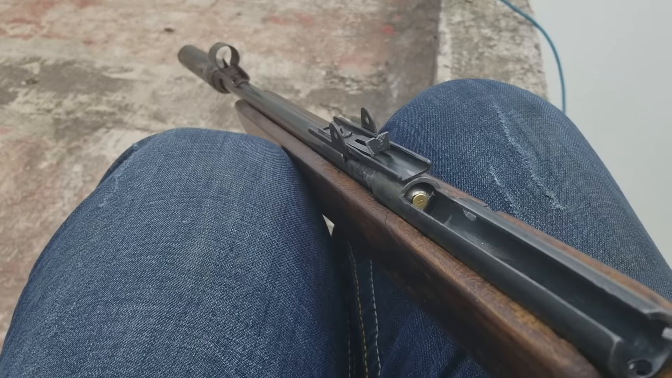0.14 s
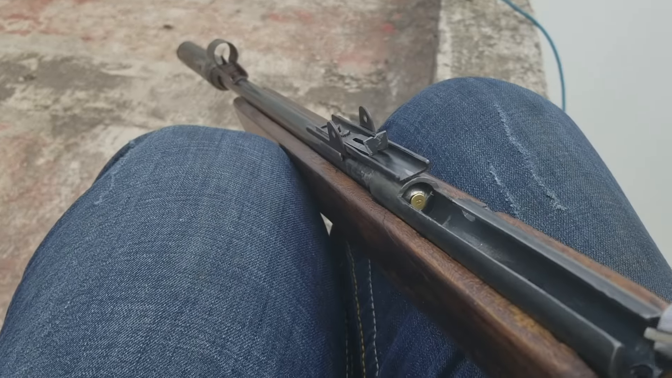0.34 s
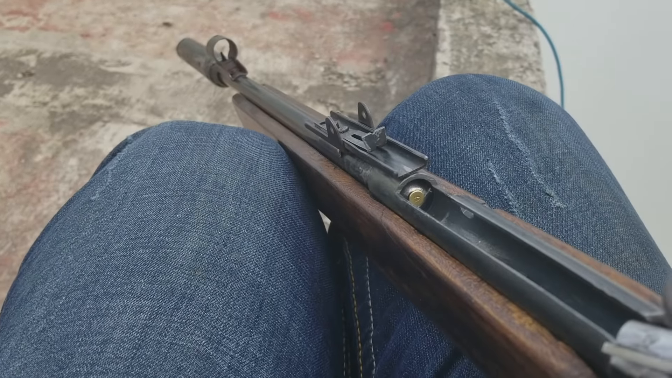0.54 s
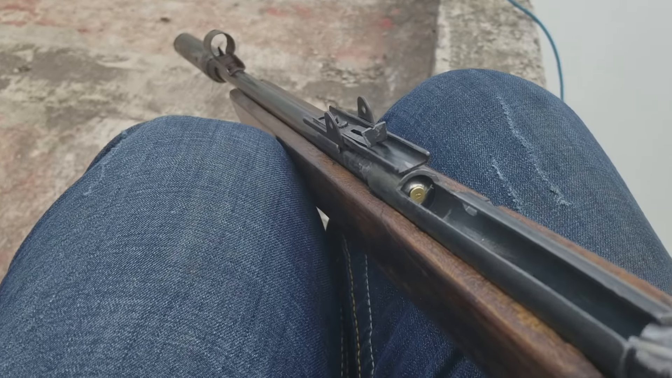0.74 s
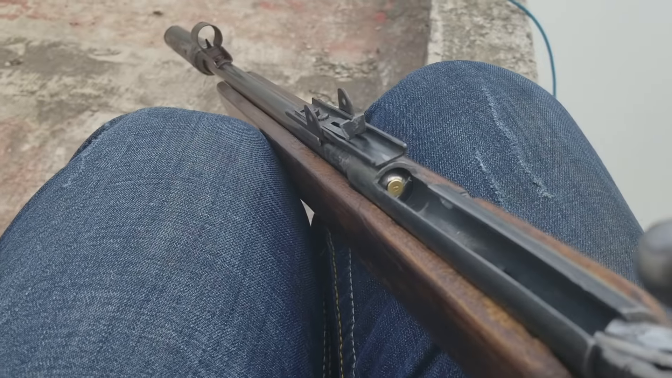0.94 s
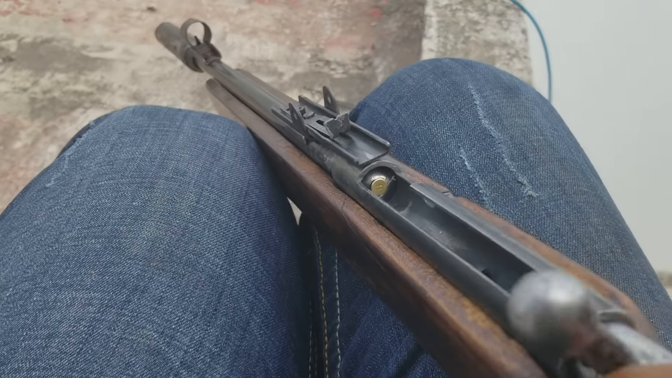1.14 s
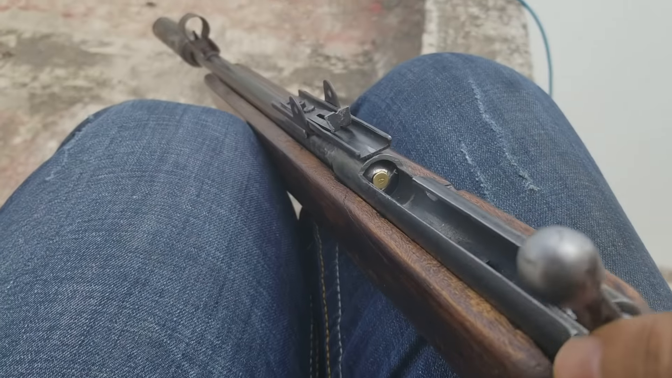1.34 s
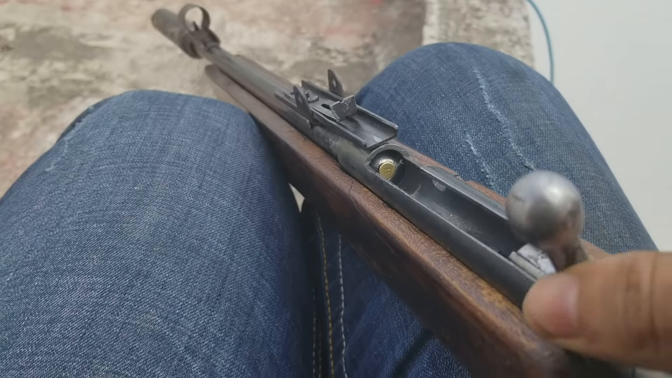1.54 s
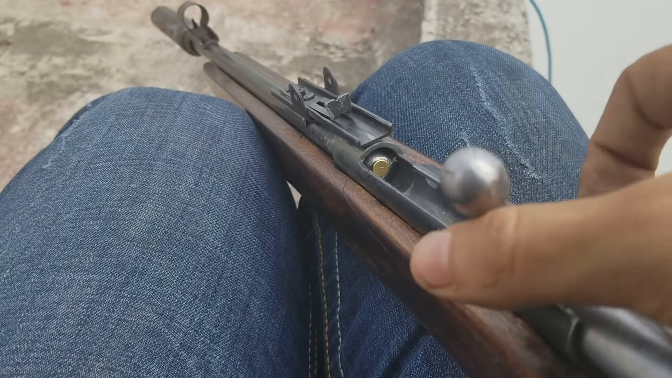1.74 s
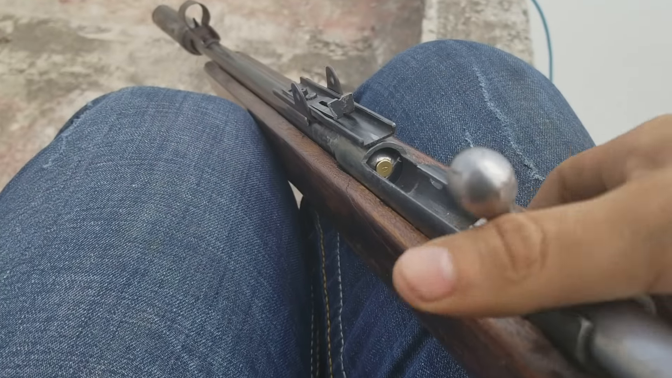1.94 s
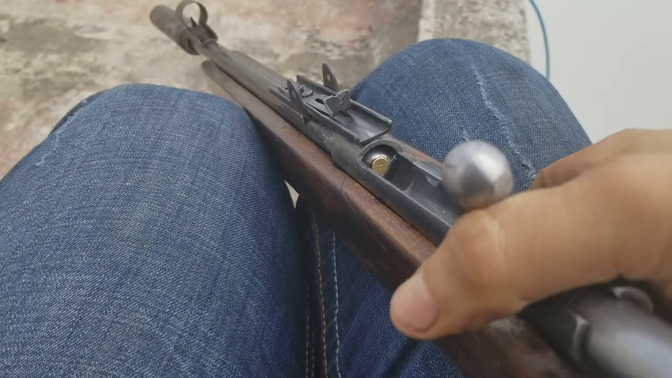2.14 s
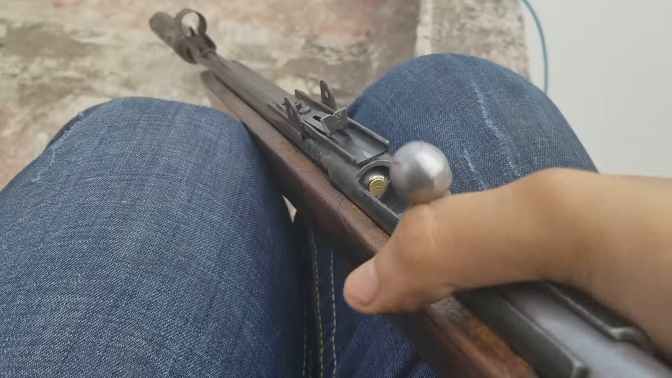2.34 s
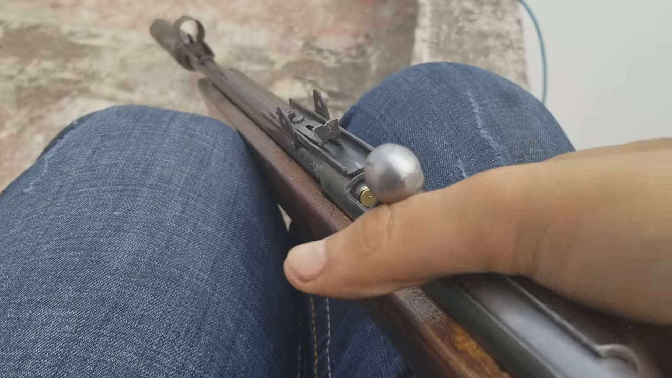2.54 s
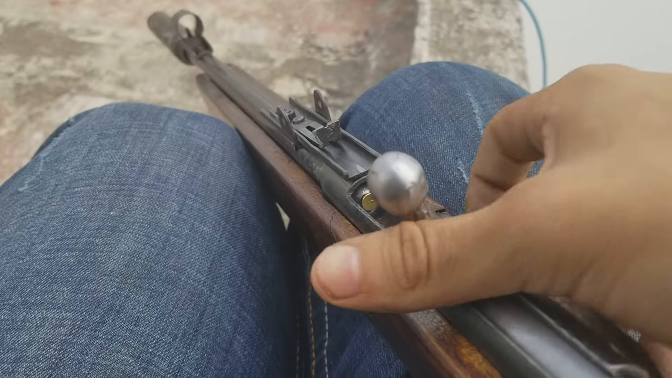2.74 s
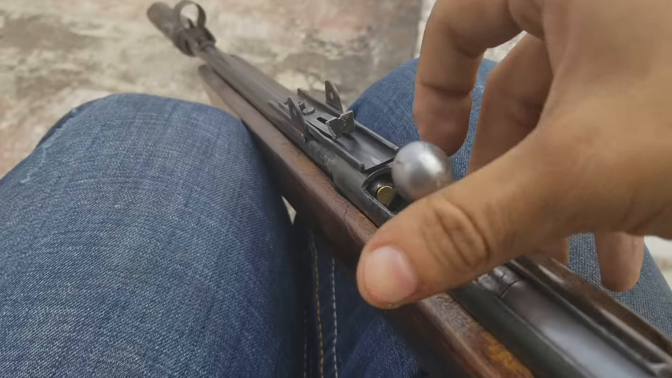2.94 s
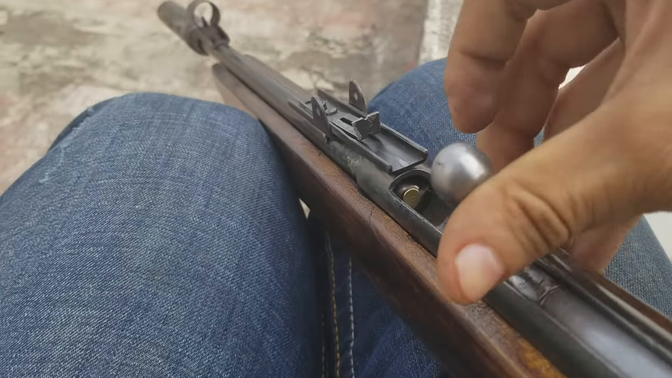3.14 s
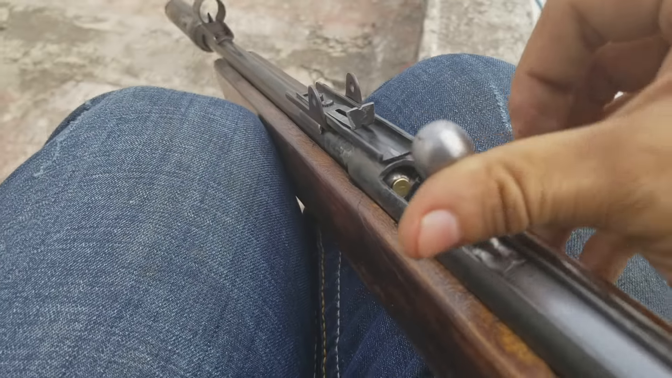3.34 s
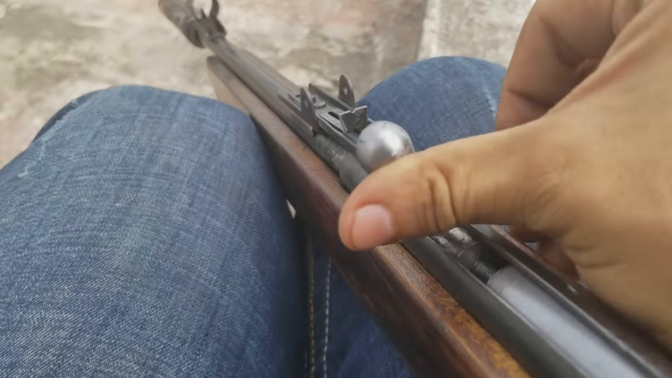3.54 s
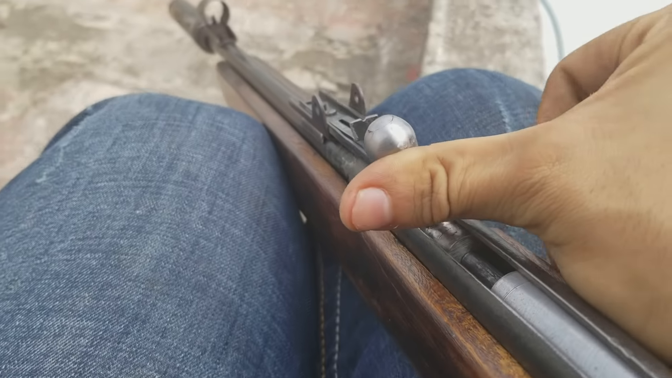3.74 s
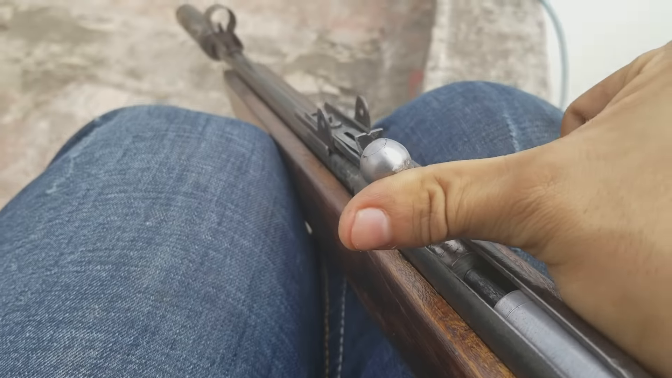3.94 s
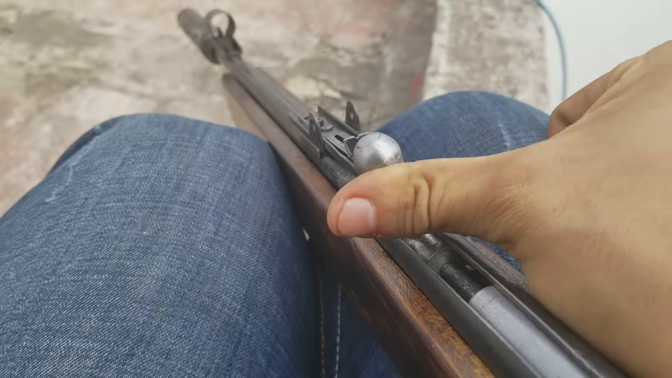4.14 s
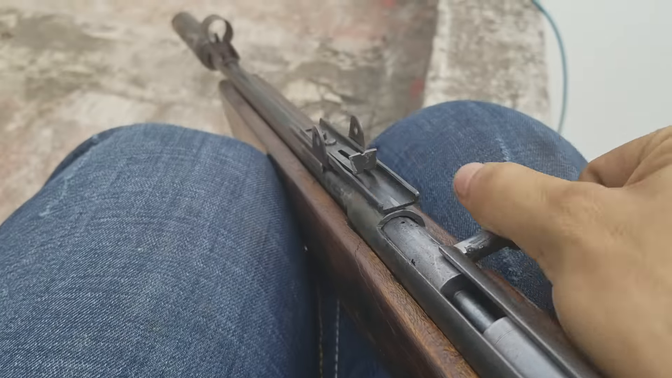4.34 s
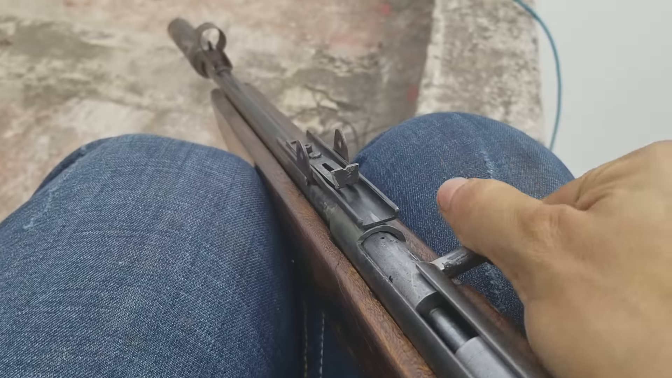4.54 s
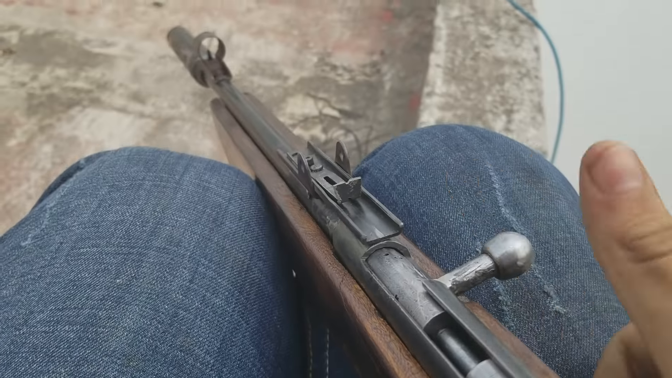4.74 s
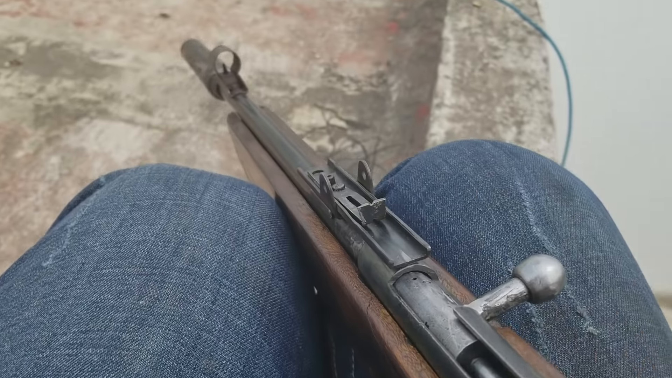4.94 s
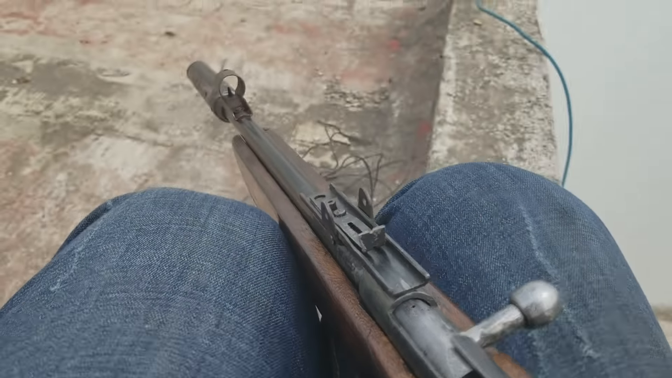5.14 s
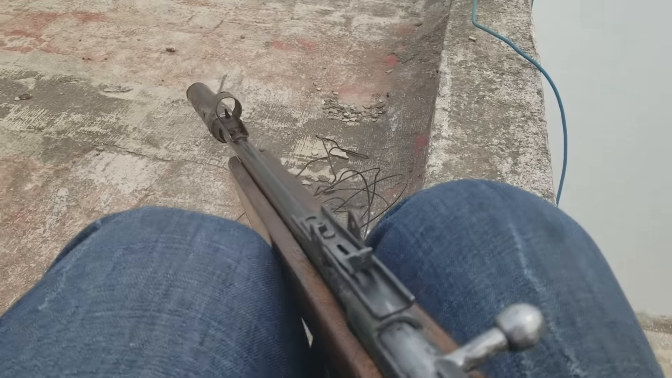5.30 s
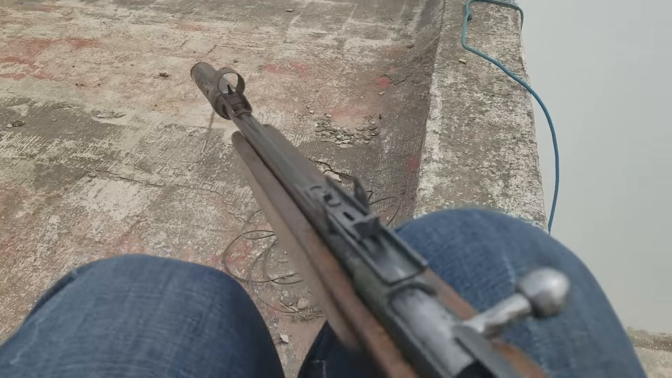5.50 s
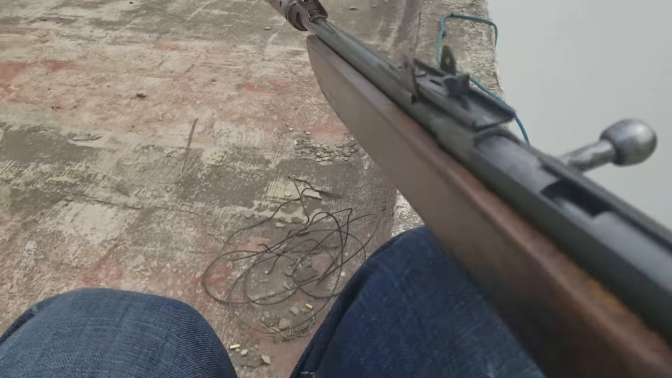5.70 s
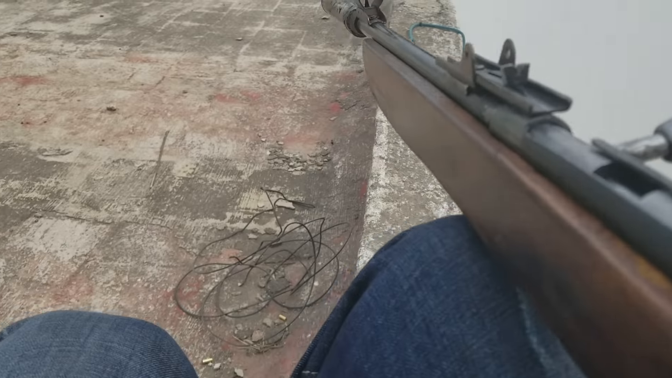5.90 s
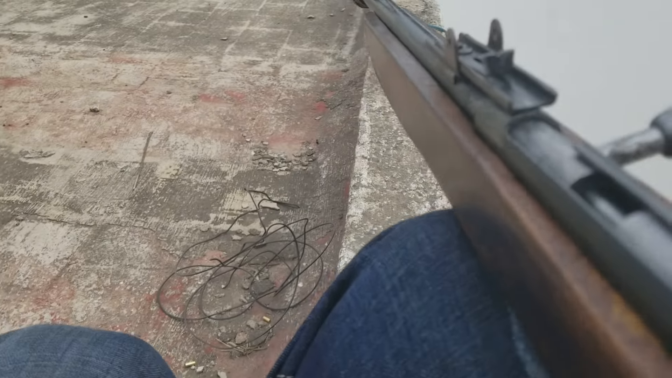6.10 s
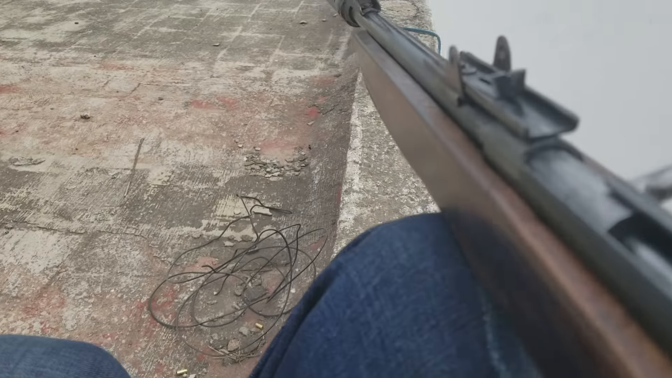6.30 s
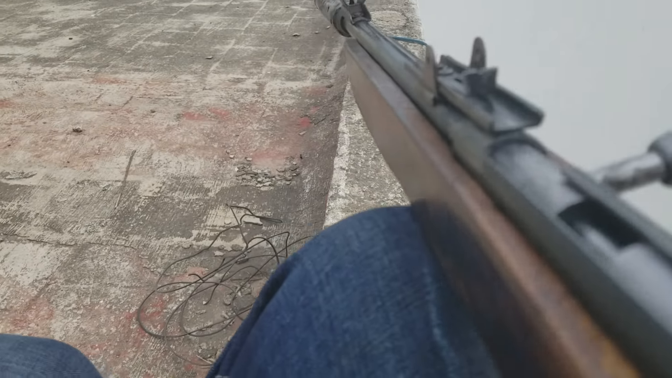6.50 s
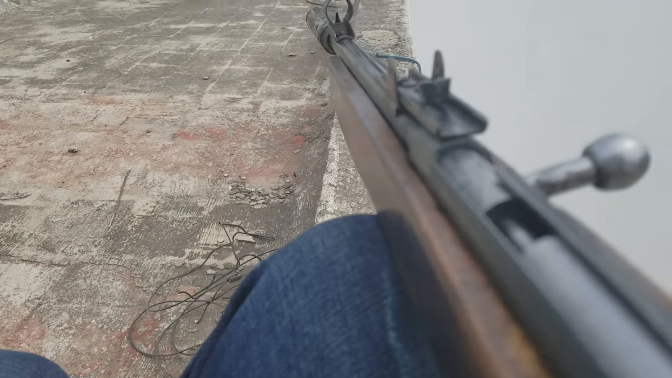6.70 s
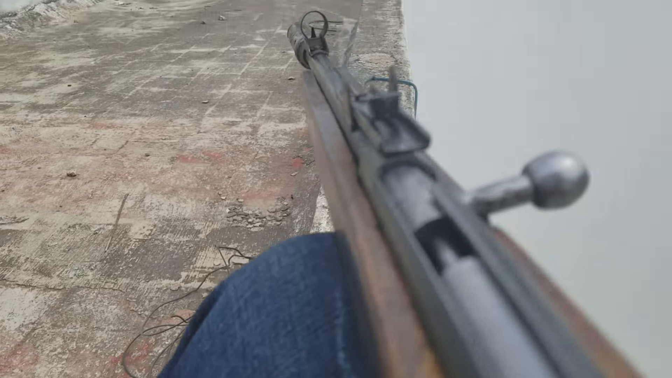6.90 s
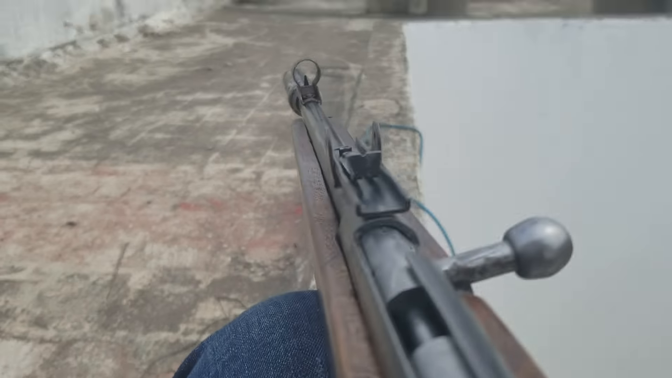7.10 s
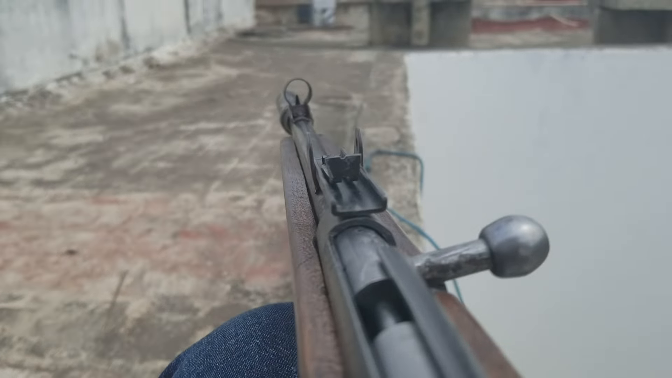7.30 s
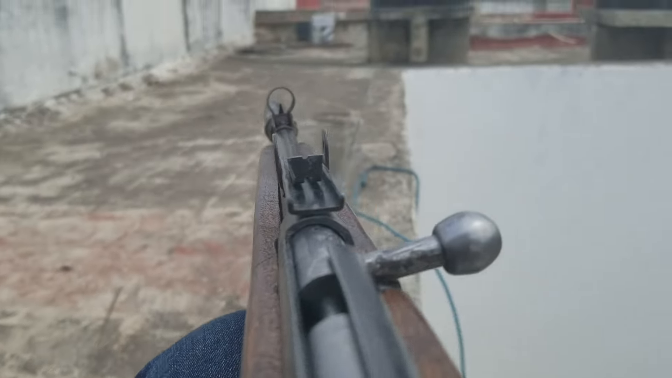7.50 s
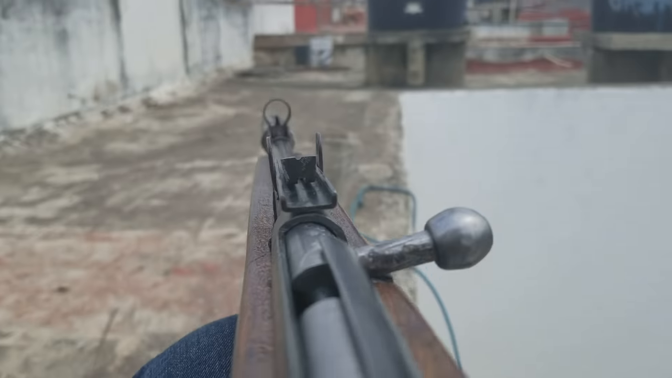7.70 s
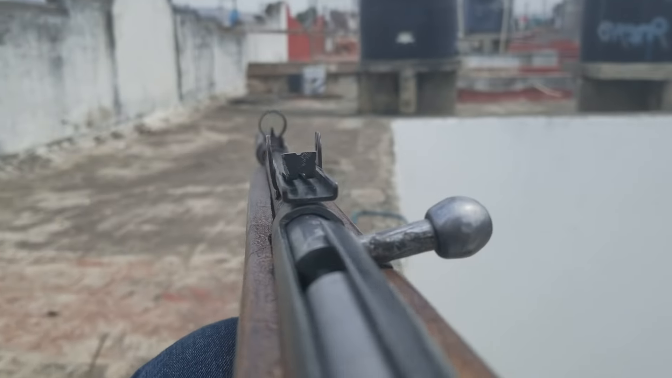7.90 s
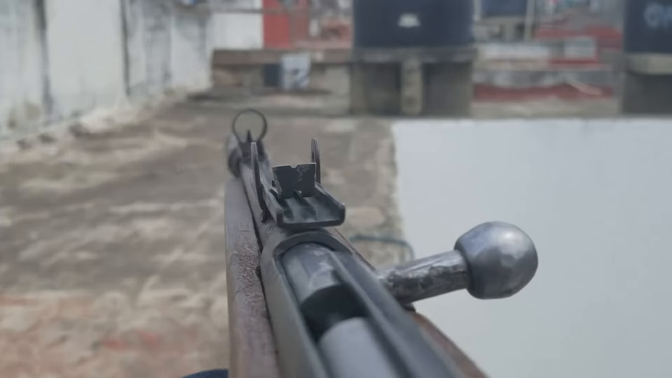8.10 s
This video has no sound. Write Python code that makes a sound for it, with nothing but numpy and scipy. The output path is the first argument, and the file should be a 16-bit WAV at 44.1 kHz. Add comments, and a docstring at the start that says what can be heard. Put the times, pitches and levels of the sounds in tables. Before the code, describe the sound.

Close, dry metallic clicks and clacks of a small rifle's bolt worked by hand, with soft cloth rubs and faint sparrows over quiet distant traffic.

```python
"""In a town, close to a phone with two microphones, a hand works the steel bolt of a small rifle on two knees.
At first a palm brushes the stock (narrow noise bands) and a far sparrow chirps (trilled tones, echoes only).
From 0.25 s steel knocks (short bursts of force) and scrapes (gritty force) sound the rifle's modes; the barrel rings.
The hardest knocks come near 2.5 and 3.4 s; from 4.5 s palm and cloth rub more, over fainter knocks near 6.5 s.
Sparrows chirp more after 6.8 s; traffic rumble, drone and hiss (shaped noise) lie behind everything."""
import sys
import numpy as np
from scipy import signal
from scipy.fft import rfft, irfft, next_fast_len
from scipy.io import wavfile
from scipy.ndimage import uniform_filter1d, minimum_filter1d, map_coordinates

SR = 44100
rng = np.random.default_rng(int(sys.argv[2]) if len(sys.argv) > 2 else 0)


def waveform_to_disk(signal):
    """Save audio, clipped to [-1, 1], as 16-bit WAV at the path in sys.argv[1]."""
    frames = np.transpose(np.atleast_2d(signal))
    scaled = np.clip(frames, -1, 1) * 32767
    samples = np.round(scaled).astype(np.int16)
    wavfile.write(sys.argv[1], SR, samples)


N = 359575  # samples

# Contacts of steel on steel: t/s, nominal peak level/dB, wood level re action/dB,
# favoured wood f/Hz, hardness (bolt level re action)/dB
KNOCKS = [(.2479, -21.5, -1.5, 567, -31), (.4813, -45, 13, 1040, -16.5), (.4933, -34, 7, 1020, -6.5),
          (.5024, -29.5, 7, 1010, -10.5), (.5193, -29.5, 1, 650, -9), (.729, -11, -7.5, 960, -9.5),
          (.7397, -18.5, -5, 520, -21), (.7891, -18.5, -2, 975, -11), (1.0304, -25, -0.5, 503, -8),
          (1.1395, -39.5, 6.5, 1030, -2.5), (1.1645, -30, 4, 520, -15), (1.179, -32.5, -17.5, 880, -3),
          (1.3637, -37, -9, 810, -9.5), (1.482, -24, -7, 1050, 6), (1.506, -23, -6, 800, -15),
          (1.601, -35.5, -10.5, 994, -16.5), (1.612, -24, -10, 1010, -11.5), (1.6402, -27.5, 1, 570, -21.5),
          (1.696, -10, -5, 750, -11), (2.1985, -33.5, 5, 800, -8.5), (2.3224, -20, -8.5, 520, -14.5),
          (2.3308, -28.5, -4.5, 840, -8.5), (2.4031, -51, -19.5, 840, -11.5), (2.5015, -1.5, -18, 560, -6),
          (2.7314, -49, -19, 500, -11), (3.4095, -6.5, -11.5, 524, -6.5), (3.5607, -50.5, -6, 840, 1.5),
          (3.6508, -33.5, 2, 784, -2.5), (3.7697, -51.5, 6, 450, 8), (4.0872, -21.5, 3, 820, 3),
          (4.129, -45, 8, 460, -12), (4.265, -55.5, 2, 830, -1), (4.3635, -12, -4, 627, -7),
          (4.7055, -51, -11, 830, -9), (4.845, -31.5, -1, 534, -17), (5.1669, -43.5, -6.5, 840, -4),
          (6.1049, -52.5, -11, 520, -3.5), (6.472, -55, 2, 520, -1.5), (6.543, -63, -3, 520, 3),
          (6.6225, -59, 0.5, 850, 2.5), (6.6625, -54, -9, 520, -9)]
# Strokes of the bolt along the rails: start t/s, end t/s, start level/dB, wood level re action/dB,
# favoured wood f/Hz, hardness/dB, swell to the end/dB
STROKES = [(0.474, 0.591, -37.5, 1.5, 1000, -11, -25.5), (0.645, 0.719, -66.5, 4, 1030, -2, 19),
           (.744, 0.791, -42, -6.5, 900, -22.5, -0.5), (1.14, 1.201, -40.5, 6, 1110, -8, -1),
           (1.333, 1.451, -47, -2.5, 910, -7, -10.5), (1.476, 1.544, -23, -1.5, 666, -14.5, -17.5),
           (1.577, 1.703, -41, 0.5, 650, -14, 5.5), (1.723, 1.858, -56, -7.5, 695, -10.5, 3.5),
           (2.305, 2.373, -30, -6.5, 530, -7.5, -5.5), (2.393, 2.427, -54, -2.5, 525, -12.5, 4.5),
           (3.357, 3.408, -72.5, 0, 700, -3, 21.5), (3.52, 3.613, -50.5, -1, 610, -6.5, -8),
           (3.735, 3.773, -58.5, -1, 890, -12, 2), (4.1, 4.207, -60.5, -3.5, 820, 0, -3.5),
           (4.289, 4.364, -65.5, -1.5, 840, -2.5, 22), (4.374, 4.485, -57.5, -3, 840, -15, -10.5),
           (5.136, 5.301, -52.5, -7, 700, -4, -21.5), (6.251, 6.402, -64.5, 4.5, 700, -2, -1)]
# Modes of the rifle's parts, levels before the favoured pitch weighs them: f/Hz, level/dB, t60/s
ACTION_MODES = [(1500, -9, .012), (1780, -2, .018), (1960, 0, .014), (2240, 0, .014), (2440, -1, .014),
                (2750, -4, .012)]
BUTT_MODES = [(366, -4, .1), (430, -2, 0.068), (483, 7.5, 0.029), (571, -10, 0.032)]
FORE_END_MODES = [(759.3, -9, 0.027), (837.3, 0.5, .05), (1017, 6, 0.029), (1236, -2.5, 0.061),
                  (1214, -1, 0.066)]
BOLT_MODES = [(3070, 0, .01), (3450, -2, .008), (4000, -1, .009), (4400, -1, .009), (5100, -3, .008)]
EDGE_MODES = [(5700, 0, .007), (6400, -2, .006), (7300, -5, .006), (8500, -8, .005), (10300, -9, .004),
              (11900, -4, .005), (13300, -12, .004), (15000, -14, .004)]
# Long modes of the barrel: f/Hz, t60/s
BARREL_MODES = [(1240, .3), (1765, .16), (1880, .28), (2120, .22), (2360, .25), (2790, .18)]
# Moments when the barrel starts ringing, after knocks or during a scrape:
# t/s, level at the favoured pitch/dB, favoured f/Hz
BARREL_RINGS = [(.25, -45, 2200), (.25, -54, 1240), (.735, -38, 2300), (.79, -39, 1880), (1.196, -46, 1240),
                (1.7, -42, 2240), (1.79, -50, 1880), (2.505, -36, 1765), (2.503, -43, 2400),
                (3.415, -35, 1765), (3.412, -43, 2500), (4.367, -48, 1800)]

# Slides of the palm on the stock: start t/s, end t/s, level/dB, share of the flat grip/0-1
PALM_SLIDES = [(-0, 0.092, -66, 0), (0.33, 0.503, -64, 0.3), (2.178, 2.3, -56, 0.45),
               (2.553, 2.75, -60.5, 0.06), (2.725, 2.982, -64, 0.05), (4.562, 5.039, -54.5, 0.2),
               (5.925, 6.205, -66, 0.1), (6.213, 6.444, -57.5, 0.92), (6.54, 6.716, -66, 0.83)]
# Bands of the cupped palm, and the lower ones of the palm pressed flat: f/Hz, width/Hz, level/dB
CUPPED_PALM = [(1620, 300, -13), (2110, 130, 0), (2400, 250, -11), (2900, 500, -19)]
FLAT_PALM = [(1800, 260, 0), (2050, 200, -5)]
# Cloth rubbing as the rifle shifts on the knees: t/s, upper hiss level/dB, lower hiss level/dB
CLOTH_LEVELS = [(0, -87, -74), (.62, -81.5, -69.5), (.8, -82.5, -71), (1.08, -74, -64), (1.8, -68.5, -58),
                (1.95, -79.5, -76), (2.17, -77.5, -75.5), (2.4, -72.5, -57.5), (2.9, -79, -77.5),
                (3.25, -87, -83), (3.55, -72, -55.5), (3.9, -84, -86), (4.25, -75, -70.5),
                (4.65, -94.5, -81.5), (4.7, -69, -69.5), (4.82, -68, -58), (4.88, -72, -70),
                (5.03, -69.5, -70.5), (5.29, -67.5, -66.5), (5.34, -75.5, -76), (5.4, -70.5, -75),
                (5.75, -66, -59), (6.2, -72, -75.5), (6.33, -65.5, -62), (6.44, -76.5, -73),
                (6.72, -71, -75), (7.05, -89.5, -85)]
# Spectra of the upper and the lower cloth hiss: f/Hz, relative level per Hz/dB
UPPER_CLOTH = [(2650, -35.5), (4500, 0), (8640, -3.5), (11500, -8.5), (13600, -17), (16000, -16)]
LOWER_CLOTH = [(600, -29.5), (1000, 1.5), (2000, -3.5), (3500, -5), (5000, -10.5), (8000, -30.5)]

# Far sparrow chirps: t/s, length/s, start f/Hz, end f/Hz, level/dB
CHIRPS = [(0.002, 0.075, 4160, 3500, -65.5), (0.182, 0.14, 3930, 3130, -61),
          (0.313, 0.042, 4730, 3620, -55.5), (0.848, 0.076, 4600, 4100, -64),
          (0.917, 0.05, 4000, 4140, -69), (2.885, 0.15, 4410, 3550, -67), (5.096, 0.047, 4410, 3220, -56.5),
          (5.93, 0.049, 4400, 3700, -60.5), (6.826, 0.098, 4700, 3170, -60),
          (7.273, 0.036, 3950, 3970, -62.5), (7.293, .09, 4390, 2686, -59.5),
          (7.463, 0.067, 5040, 6330, -69.5), (7.66, 0.05, 4100, 3950, -76.5), (7.88, 0.1, 4630, 3626, -64),
          (7.967, 0.14, 3310, 3060, -72), (7.995, 0.13, 4230, 4880, -69)]
# Course of the town: t/s, rumble level/dB, drone level/dB, upper drone level/dB
TOWN_LEVELS = [(0.0, -65.5, -62, -69), (0.97, -64.5, -57, -88), (1.66, -65, -65, -58.5),
               (1.84, -68, -63, -83.5), (3.83, -70, -66.5, -92), (5.11, -65, -60.5, -69),
               (8.15, -63.5, -63.5, -69.5)]
# Spectrum of the traffic rumble: f/Hz, relative level per Hz/dB
RUMBLE = [(8.8, -43.5), (15, -17), (64, -3), (107, -6), (140, -5.5), (182, -11), (260, -14.5), (340, -28),
          (570, -120)]
# Resonances of the drone, lower and upper: f/Hz, width/Hz, relative level/dB
LOWER_DRONE = [(319, 200, -0.5), (380.3, 120, 4), (515, 18, -5.5)]
UPPER_DRONE = [(577, 34, -5.5), (793, 220, -6)]
# Hiss of far air and microphones: f/Hz, relative level per Hz/dB
FAR_HISS = [(600, -27), (900, -16), (1500, -10), (2300, -13.5), (3200, -18.5), (5000, -15), (9000, -22),
            (14300, -19.5), (16500, -26)]
# Likeness of noise at the two microphones: f/Hz, left-right correlation/0-1
LIKENESS = [(40, .45), (130, .8), (290, .9), (640, .73), (1400, .1), (15000, .1)]
# Near sound at the left microphone over the right: f/Hz, level difference/dB
LEFT_LEAN = [(60, -17.5), (300, 8.5), (700, -0.5), (2000, 5.5), (4400, 8), (8000, 12.5), (15000, 7.5)]

KNOCK_EDGES_DB, STROKE_EDGES_DB = -8.5, -6  # edges over bolt
# Modes weaken away from the favoured pitch
ACTION_HZ, ACTION_DB_PER_OCTAVE, WOOD_DB_PER_OCTAVE = 2100, 15.5, 20.5
CHATTER_S, CHATTER_DB = 0.0022, 20.5  # time scale of a knock; energy that brings its peak to the nominal level
BLOW = 1.1  # main blow over the norm of the chatter around it
PALM_RISE_HZ = 169.5  # climb of the palm's band at the strongest slide
ECHO_DB, ECHO_DULL_HZ = -18, 3320  # floor and walls return less treble
MIC_LAG = 11  # samples by which the near sound reaches the right microphone later
TOP_HZ = 16000  # the phone's band limit


def amp(db):
    """Amplitude factor of a level in dB."""
    return 10 ** (np.asarray(db) / 20)


def unit(x):
    """x scaled to rms 1."""
    return x / np.sqrt(np.mean(x ** 2) + 1e-20)


def along(points, hz):
    """Reads (f/Hz, value) points on a log frequency axis."""
    f, value = np.transpose(points)
    return np.interp(np.log(hz + 1), np.log(f + 1), value)


def curves(rows):
    """One value per sample for each column after the time."""
    s, *columns = np.transpose(rows)
    return [np.interp(np.arange(N) / SR, s, column) for column in columns]


def wobble(rate, size=N):
    """A smooth random curve with rate knots a second."""
    knots = rng.standard_normal(int(size * rate / SR) + 4)
    return map_coordinates(knots, [np.arange(size) * rate / SR])


def filtered(x, response):
    """x passed through a complex response of frequency."""
    m = next_fast_len(N + SR // 2)
    hz = np.fft.rfftfreq(m, 1 / SR)
    return irfft(rfft(x, m) * response(hz), m)[..., :N]


def spectrum(points):
    """The amplitude response that follows (f/Hz, level/dB) points."""
    return lambda hz: amp(along(points, hz))


def peaks(table):
    """The response of resonances, each applied twice for steep skirts."""
    def response(f):
        total = 0
        for centre, width, db in table:
            resonance = 1j * f * width / (centre * centre - f * f + 1j * f * width)
            total = total + amp(db) * resonance ** 2
        return total
    return response


def rush(response, patchy_db):
    """Stereo noise of rms 1 in patches of random gain, its likeness between microphones set by pitch."""
    z = signal.stft(rng.standard_normal((2, N)), nperseg=512)[2]
    field = uniform_filter1d(rng.standard_normal(z.shape[1:]), size=5, axis=0)
    field = uniform_filter1d(field, size=10, axis=1)
    pair = signal.istft(z * amp(patchy_db * unit(field)), nperseg=512)[1][:, :N]

    def mid_side(hz):
        turn = np.arccos(np.clip(along(LIKENESS, hz), -1, 1)) / 2
        return response(hz) * np.array([np.cos(turn), np.sin(turn)])

    mid, side = filtered(pair, mid_side)
    return unit(np.array([mid + side, mid - side]))


def add(track, s, sound):
    """Mixes a sound in at s seconds."""
    start = round(s * SR)
    track[:, start:start + sound.shape[1]] += sound


def rifle(force, wood_db, wood_hz, hard_db, edges_db, count=7):
    """All parts answer a force: each mode is a new bunch of close partials that reach the two microphones differently.
    Hands and knees damp the stock, so each contact favours one pitch of the wood."""
    t, sound = np.arange(SR // 11) / SR, 0
    parts = [(ACTION_MODES, 0, ACTION_HZ, ACTION_DB_PER_OCTAVE),
             (BUTT_MODES + FORE_END_MODES, wood_db, wood_hz, WOOD_DB_PER_OCTAVE),
             (BOLT_MODES, hard_db, 1, 0),  # slope 0: no favoured pitch
             (EDGE_MODES, hard_db + edges_db, 1, 0)]
    for modes, part_db, favoured_hz, slope_db in parts:
        hz, db, t60 = np.repeat(modes, count, axis=0).T[:, :, None]
        db = db - slope_db * np.abs(np.log2(hz / favoured_hz))
        level_luck, pitch_luck, path_luck = rng.standard_normal((len(hz), 3)).T[:, :, None]
        # The two paths differ by more cycles at high pitch
        lag = np.clip(hz / 1200, 0, 3) ** 2 * path_luck / 2
        fade = amp(db + level_luck - 60 * t / t60) * (1 - np.exp(-t * hz))
        detune = 1 + .065 * np.clip(hz / 2500, 0, 1) * pitch_luck
        phase = 2 * np.pi * hz * detune * t
        left = np.sum(fade * np.sin(phase), 0)
        right = np.sum(fade * np.sin(phase - lag), 0)
        part = signal.fftconvolve([left, right], [force], axes=1)
        # Each part takes a set share of the force's energy
        share = np.linalg.norm(force) / np.linalg.norm(part, axis=1, keepdims=True)
        sound = sound + amp(part_db) * share * part
    return sound


def knocks():
    """A knock is milliseconds of chatter between loose parts around one main blow, with a faint scuff about it."""
    out, t = np.zeros((2, N + SR)), np.arange(-SR // 50, SR // 50) / SR
    u = np.clip(t / CHATTER_S, 0, None)
    chatter = u ** 2 * np.exp(-1.5 * u)
    scuff = .01 * np.exp(-np.abs(t) / .004)  # begins before the contact, as the parts close in
    shape = chatter + scuff
    for s, db, *colour in KNOCKS:
        force = rng.standard_normal(len(t)) * shape
        force[np.argmax(shape)] += BLOW * np.linalg.norm(force)
        sound = rifle(force / np.linalg.norm(force), *colour, KNOCK_EDGES_DB)
        add(out, s + t[0] - .001, amp(db + CHATTER_DB) * sound)
    return out[:, :N]


def strokes():
    """Sliding steel catches on its tool marks: gritty force in uneven bunches."""
    out = np.zeros((2, N + SR))
    for start, end, db, *colour, swell_db in STROKES:
        u = np.linspace(0, 1, round((end - start) * SR))
        bunches = amp(4.5 * wobble(300, size=len(u)))
        grit = unit(rng.standard_normal(len(u)) * bunches)
        ends = np.clip(5 * u, 0, 1) * np.clip(6 * (1 - u), 0, 1)  # fade in and out
        force = grit * amp(db + swell_db * u) * ends
        add(out, start, rifle(force, *colour, STROKE_EDGES_DB))
    return out[:, :N]


def barrel():
    """Each start favours some of the long modes, which ring on; the grip makes each flutter in level and pitch."""
    out, t = np.zeros((2, N + SR)), np.arange(SR // 2) / SR
    hz, t60 = np.transpose(BARREL_MODES)[:, :, None]
    for s, db, favoured_hz in BARREL_RINGS:
        flutter = np.array([wobble(60, size=len(t)) for _ in range(2 * len(hz))])
        level_flutter, phase_flutter = flutter.reshape(2, len(hz), -1)
        favour_db = -110 * np.abs(np.log(hz / favoured_hz))
        level = amp(db + favour_db - 60 * t / t60 + 4.5 * level_flutter)
        # Random start phases, separate for the two microphones
        phase = 2 * np.pi * (hz * t + rng.random((2, len(hz), 1))) + .7 * phase_flutter
        onset = 1 - np.exp(-t / 0.002)
        add(out, s, np.sum(level * onset * np.sin(phase), axis=1))
    return out[:, :N]


def palm():
    """Skin slides on the stock in narrow bands; the cupped palm's band climbs with the strength of the slide."""
    t, cupped, flat = np.arange(N) / SR, 0, 0
    for start, end, db, share in PALM_SLIDES:
        u = np.clip((t - start) / (end - start), 0, 1)
        stroke = amp(db) * np.abs(np.sin(np.pi * u)) ** 1.28
        cupped = cupped + np.clip(1 - share, 0, 1) * stroke
        flat = flat + np.clip(share, 0, 1) * stroke
    rise_hz = PALM_RISE_HZ * cupped / cupped.max()
    climb = np.exp(2j * np.pi * np.cumsum(rise_hz) / SR)
    band = signal.hilbert(rush(peaks(CUPPED_PALM), patchy_db=0.5), next_fast_len(N))[:, :N]
    band = np.real(band * climb)  # shifts the band upward
    return cupped * band + flat * rush(peaks(FLAT_PALM), patchy_db=-1.5)


def cloth():
    """Trouser cloth hisses under the rifle in an upper and a lower band that flicker together."""
    upper_db, lower_db = curves(CLOTH_LEVELS)
    upper = amp(upper_db) * rush(spectrum(UPPER_CLOTH), patchy_db=1.6)
    lower = amp(lower_db) * rush(spectrum(LOWER_CLOTH), patchy_db=3.3)
    return amp(1.2 * wobble(30)) * (upper + lower)


def terrace(x, t60):
    """Floor and walls answer with a diffuse decaying tail of energy 1."""
    t = np.arange(SR // 2) / SR
    tail = rng.standard_normal((2, len(t))) * amp(-60 * t / t60) * np.clip(t / 0.011, 0, 1)
    return signal.fftconvolve(x, tail / np.linalg.norm(tail[0]), axes=1)[:, :N]


def sparrows():
    """Hoarse chirps, trilled so fast that they smear into bands, and so far off that only their echoes arrive."""
    out = np.zeros((1, N + SR))
    for s, length, from_hz, to_hz, db in CHIRPS:
        u = np.linspace(0, 1, round(length * SR))
        trill_hz = 330 * wobble(160, size=len(u))
        hz = from_hz + (to_hz - from_hz) * u + trill_hz
        swell = np.sin(np.pi * u)[None] ** .5
        add(out, s, amp(db) * swell * np.sin(2 * np.pi * np.cumsum(hz) / SR))
    return terrace(out, t60=.32)


def town():
    """Traffic rumble, a hollow drone in two bands and a smooth far hiss, all as shaped noise."""
    rumble_db, lower_db, upper_db = curves(TOWN_LEVELS)
    rumble = amp(rumble_db + 2 * wobble(9)) * rush(spectrum(RUMBLE), patchy_db=1.5)
    lower_drone = amp(lower_db) * rush(peaks(LOWER_DRONE), patchy_db=1.5)
    upper_drone = amp(upper_db) * rush(peaks(UPPER_DRONE), patchy_db=5.5)
    hiss = amp(-75) * rush(spectrum(FAR_HISS), patchy_db=2.5)
    return rumble + lower_drone + upper_drone + hiss


def scene():
    """The rifle lies nearer the left microphone; the phone shades the treble from the right one."""
    steel = knocks() + strokes()
    echoes = filtered(terrace(steel, t60=.15), lambda hz: 1 / (1 + 1j * hz / ECHO_DULL_HZ))
    near = steel + amp(ECHO_DB) * echoes + barrel() + palm() + cloth()
    near[1] = np.roll(near[1], shift=MIC_LAG)

    def pickup(hz):
        small_body = (1j * hz / (270 + 1j * hz)) ** 6  # so small a body radiates no bass
        half_each_way = np.array([[.5], [-.5]])
        return small_body * amp(along(LEFT_LEAN, hz) * half_each_way)

    return filtered(near, pickup) + sparrows() + town()


def record(dry):
    """A fast limiter holds down the loudest knocks; the phone then keeps nothing above its band limit."""
    needed = np.minimum(1, .93 / (np.abs(dry).max(axis=0) + 1e-9))
    gain = uniform_filter1d(minimum_filter1d(needed, size=129), size=65)
    return filtered(dry * gain, lambda hz: hz < TOP_HZ)


dry = scene()
out = record(dry)
waveform_to_disk(out)
```